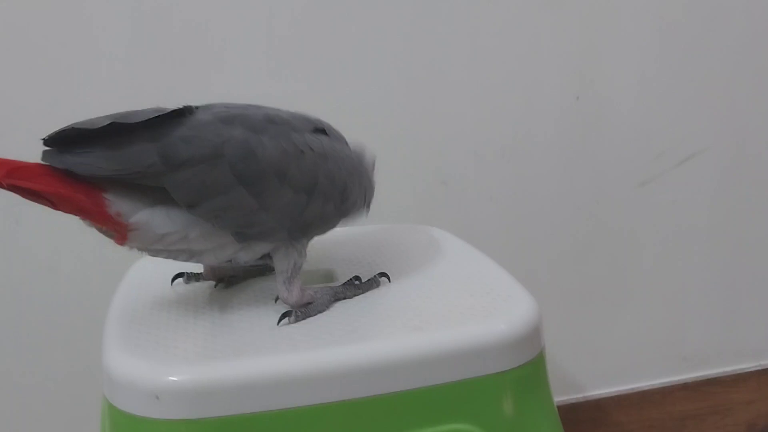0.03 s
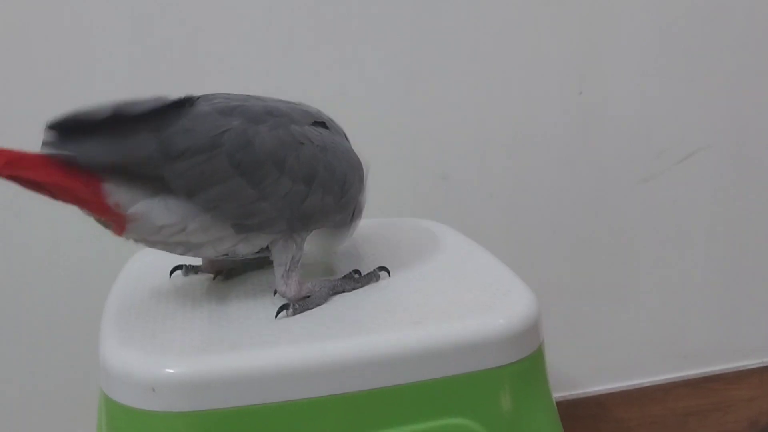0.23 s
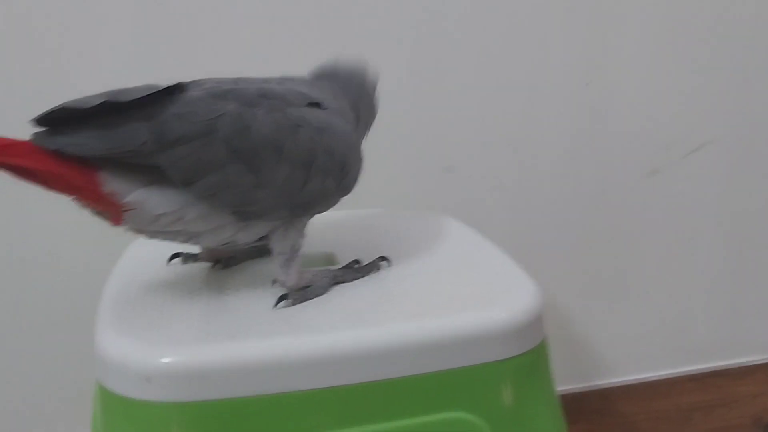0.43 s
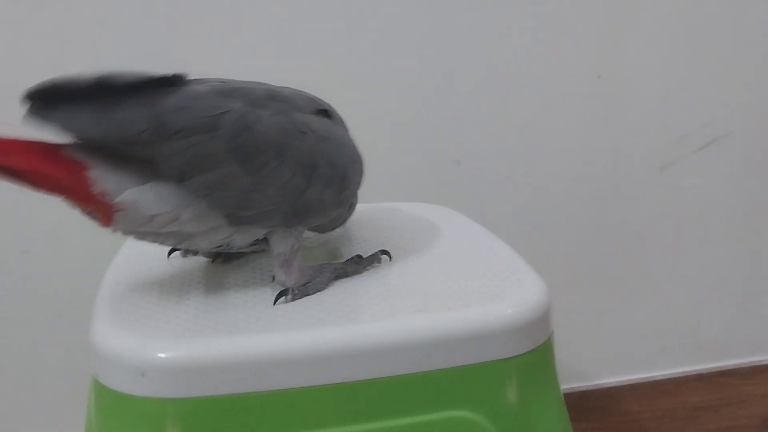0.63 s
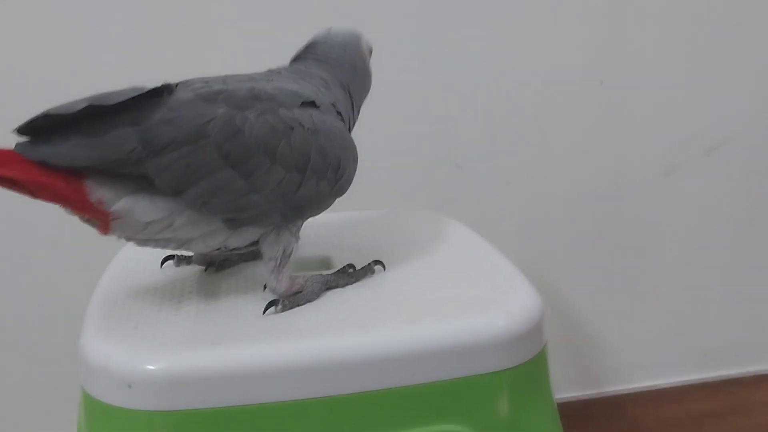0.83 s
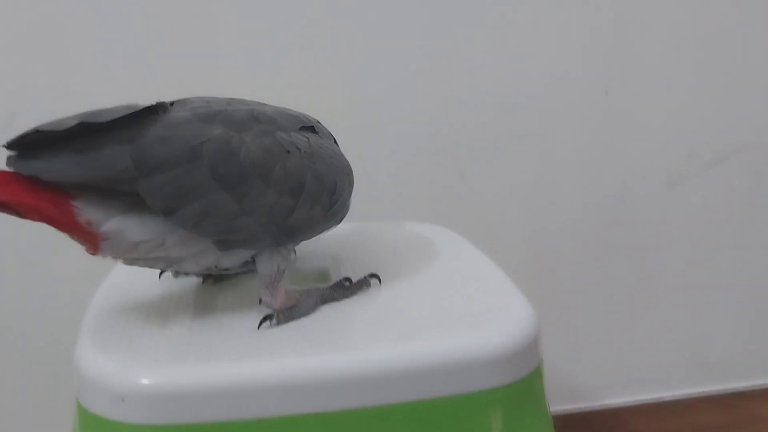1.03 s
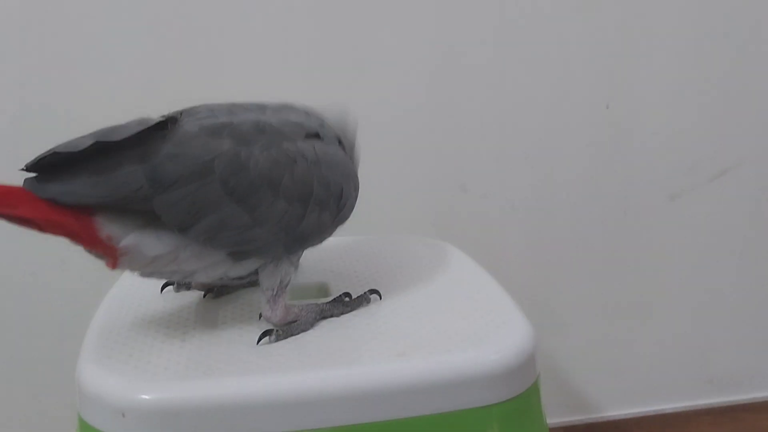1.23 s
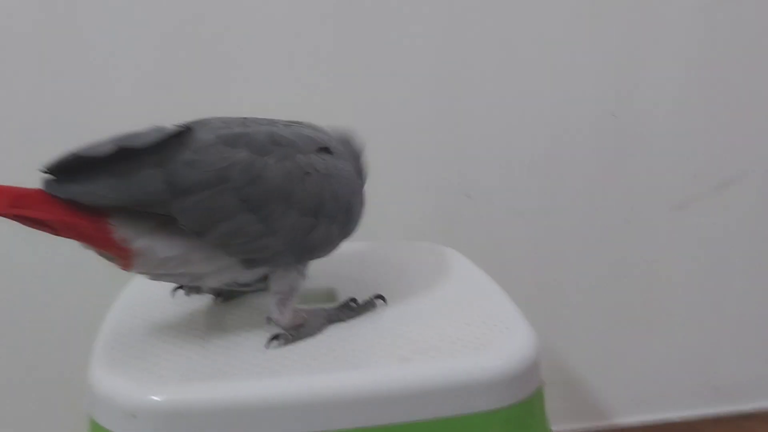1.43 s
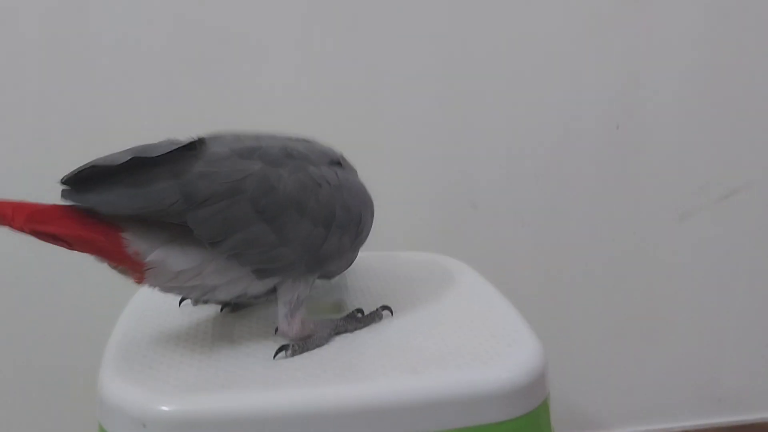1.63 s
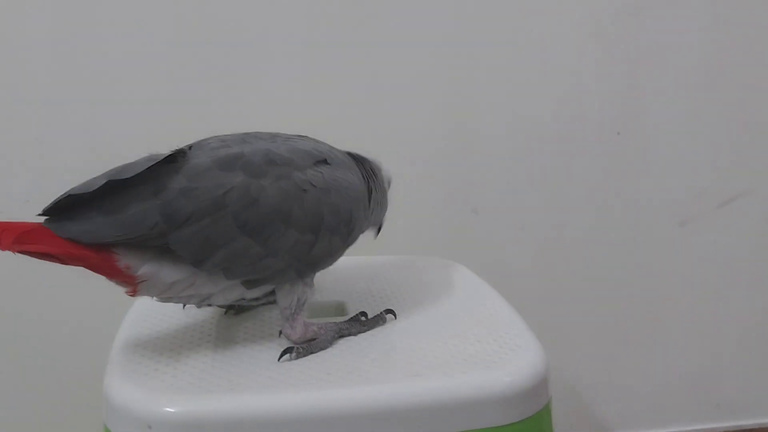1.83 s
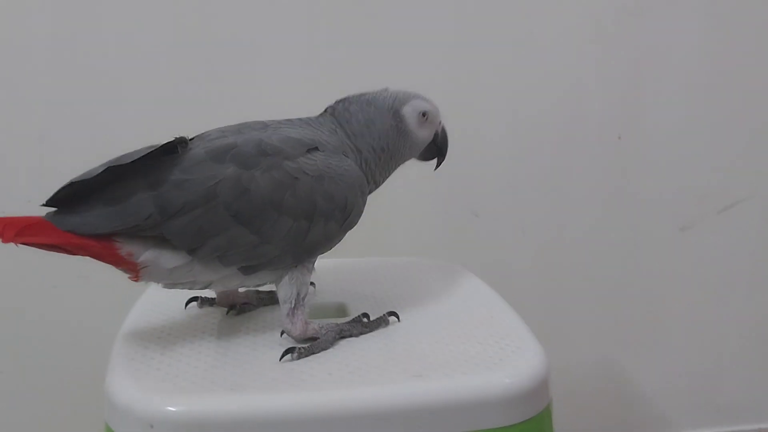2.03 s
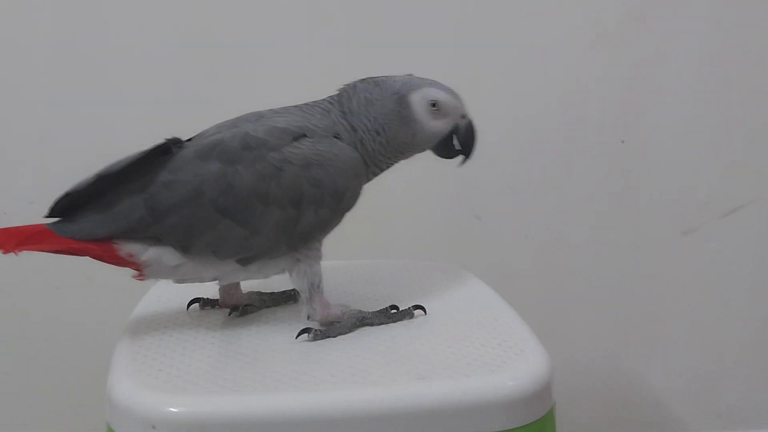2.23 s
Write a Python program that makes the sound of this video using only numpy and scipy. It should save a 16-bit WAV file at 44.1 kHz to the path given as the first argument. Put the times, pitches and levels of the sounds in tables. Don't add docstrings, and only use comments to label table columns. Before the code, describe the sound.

Six steady, sharp hollow raps of a beak on plastic, ringing in a small bare room

```python
import sys
import numpy as np
from scipy import signal
from scipy.fft import rfft, irfft
from scipy.io import wavfile

SR = 44100
rng = np.random.default_rng(int(sys.argv[2]) if len(sys.argv) > 2 else 0)


def master_out(mix):
    frames = np.transpose(np.atleast_2d(mix))
    ceiling = np.clip(frames, -1, 1)
    pcm = np.round(ceiling * 32767).astype(np.int16)
    wavfile.write(sys.argv[1], SR, pcm)


def level_to_linear(level):
    exponent = np.asarray(level, float) / 20
    return 10 ** exponent


N = 101429
LEAD = 4410

# t/s, blow level/dB, lid ring level/dB, beak click level/dB, bright edge level/dB
KNOCKS = [
    (-.035, -16.5, -10, -27, -24),
    (0.315, -17, -14.5, -26.5, -22.5),
    (.656, -17, -14.5, -26, -26.5),
    (1.006, -18, -18.5, -30.5, -29.5),
    (1.349, -19.5, -17, -28.5, -27),
    (1.6969, -24, -21.5, -32, -35.5),
]
# t/s, level/dB, length/s
TICKS = [(.246, -58.5, 0.0082), (.609, -48.5, .014), (.905, -59.5, 0.011), (0.984, -50.5, 0.011),
         (1.081, -47.5, 0.012), (2.074, -53, .006), (2.093, -65, 0.063), (2.215, -60.5, .015),
         (2.225, -57.5, .025), (2.267, -57.5, 0.049), (2.272, -54, 0.011)]
# t/s, level/dB
STEPS = [
    (2.2671, -39),
    (2.29, -36.5),
]

# f/Hz, level/dB, t60/s
LID_BODY = [(189.8, -25.5, .06), (288, -6.5, .04), (392, -12.5, 0.12), (475, -11.5, .05),
            (672, -8.5, 0.082), (882, -15, 0.041)]
LID_UPPER_RING = [(920, -23, 0.01), (1170, -22, 0.0083), (1370, 4, 0.012), (1970, -7, 0.037),
                  (2150, -15.5, 0.06), (3190, -23, 0.005)]
BEAK_CLICK = [(4750, -5, 0.019), (4940, -7.5, 0.031), (6170, -10, 0.032), (6670, 0, 0.0076),
              (6950, -14.5, .01)]

# f/Hz, level/dB
BEAK_SCRAPE = [(300, -25), (1000, -16.5), (2000, -10.5), (3200, -0.5), (5200, 16), (7500, 1), (9000, -13),
               (14000, -28.5)]
BRIGHT_EDGE = [(5000, -38.5), (8600, -8), (11800, 1), (13500, -12.5), (15200, 2.5)]
CLAW = [(500, -22), (1500, -13), (1950, -4), (2600, -16), (3900, -16), (4700, 0), (7300, -3), (9000, -14)]
FLOOR_SHAKE = [(20, -2.5), (40, -6.5), (65, -3.5), (100, -3.5), (140, -24.5), (400, -63.5)]
HUSH = [(25, -17), (60, -20), (100, -6), (160, -1.5), (400, -21.5), (900, -30), (3000, -35), (16000, -33.5)]

WAVE_HZ = [113, 135, 170, 203, 231.5, 258, 287, 332, 361, 399, 490, 516, 576, 674, 711]
# level/dB, t60/s, left over right level/dB
WAVES = [(-11, .8, -4), (-14.5, 0.61, -7.5), (-5.5, 0.8, -2.5), (1.5, .25, 3), (0, 0.55, -3),
         (-11.5, 0.78, 8.5), (-2.5, 0.76, 1), (-11, .5, -9.5), (-13, 0.96, 8.5), (-12.5, 0.39, -1),
         (-15, 0.81, 4), (-15, 0.74, -9), (-11.5, .3, -3.5), (-14, .45, 0.5), (-14.5, 0.58, -5)]
# t/s, level/dB
WALLS = [(.0027, -6), (.0062, -8), (.0092, -3.5), (.0175, -10)]

# f/Hz, t60/s
ECHO_T60 = [(100, 1), (300, 0.99), (1000, 0.56), (2500, 0.5), (5000, 0.42), (9000, 0.37), (16000, 0.2)]
# f/Hz, share/0-1
ECHO_LIKENESS = [(60, 1), (300, 1), (700, 0.04), (1500, 0), (16000, 0.5)]
# f/Hz, share/0-1
ECHO_REPEAT = [(300, .95), (1000, .8), (4000, .4)]
ECHO_SHAPE = (700, 129, 4)
# f/Hz, level/dB
BLOW_ECHO = [(100, -14.5), (170, -2.5), (260, -3), (450, 8.5), (750, 0), (1100, -15.5), (2000, -38),
             (16000, -92)]
RING_ECHO = [(300, -45.5), (800, 2), (1400, -3.5), (2000, -5), (2600, -14.5), (3300, -20.5), (5000, -21.5),
             (16000, -71)]
CLICK_ECHO = [(1500, -37.5), (3200, -9), (4300, -2.5), (5500, -5), (7400, -11.5), (8600, -28.5),
              (16000, -47.5)]
EDGE_ECHO = [(6000, -50.5), (8600, -24), (11000, -19), (13000, -11.5), (16000, -24)]

PAN_DB, LAG_S = -1.5, -.00005
BLOW_S, BEND_S = 0.00084, .0014


def read(points, hz):
    f, value = np.transpose(points)
    return np.interp(np.log(hz + 1), np.log(f + 1), value)


def add(mix, s, sound):
    part = mix[..., LEAD + round(s * SR):][..., :sound.shape[-1]]
    part += sound[..., :part.shape[-1]]


def ring(modes, wobble_db=0., size=12000):
    t = np.arange(size) / SR
    hz, db, t60 = np.transpose(modes)[:3, :, None]
    return level_to_linear(db + wobble_db - 60 * t / t60) * np.sin(2 * np.pi * hz * t)


def colour(x, table):
    gain = level_to_linear(read(table, np.fft.rfftfreq(x.shape[-1], 1 / SR)))
    return irfft(rfft(x) * gain, x.shape[-1])


def grit(table, t60, size=4096):
    x = colour(rng.standard_normal((2, size)), table)
    return x / x.std() * level_to_linear(-60 * np.arange(size) / SR / t60)


def rise(size, seconds):
    return np.minimum(np.arange(size) / SR / seconds, 1)


def hush():
    x = colour(rng.standard_normal((3, N + 1)), HUSH)[:, :N]
    return level_to_linear(-78.5) * (x[:2] + 1.3 * x[2]) / x.std()


def shake():
    out = np.zeros((2, N + LEAD))
    for s, blow_db, *_ in KNOCKS:
        rumble = grit(FLOOR_SHAKE, t60=1, size=SR) * rise(SR, 0.01)
        both_ears = rumble + .4 * rumble[::-1]
        add(out, s, level_to_linear(blow_db - 38) * both_ears)
    return out[:, LEAD:]


def echo(room, parts):
    early_db, early_t60, swell_s = -12.5, 0.21, 0.0048
    hz = np.fft.rfftfreq(256, 1 / SR)[:, None]
    t = np.arange(700) * 64 / SR
    again = read(ECHO_REPEAT, hz)
    fresh = np.sqrt(1 - again ** 2) * rng.standard_normal(ECHO_SHAPE).T
    a, b, c, d = again * room + fresh
    same = np.clip(read(ECHO_LIKENESS, hz), 0, 1)
    first, second = a + 1j * b, c + 1j * d
    ears = np.array([first, same * first + np.sqrt(1 - same ** 2) * second])
    size = np.sqrt(sum(level_to_linear(read(table, hz) + db) ** 2 for table, db in parts))
    decay = level_to_linear(-60 * t / read(ECHO_T60, hz)) + level_to_linear(early_db - 60 * t / early_t60)
    tail = signal.istft(ears * size * decay, nperseg=256, noverlap=192)[1]
    return tail * rise(tail.shape[1], swell_s) ** 2 / 10


def standing_waves(push):
    db, t60, lean_db = np.transpose(WAVES)
    wobble_db = 1.2 * rng.standard_normal((len(db), 1))
    modes = ring(np.transpose([WAVE_HZ, db, t60]), wobble_db, size=SR)
    ears = level_to_linear(np.outer([.5, -.5], lean_db)) @ modes
    return signal.fftconvolve(push[None], level_to_linear(-2.5) * ears, axes=1)


def arrivals(near):
    dull_db_per_khz, ear_s = -1, 0.00025
    hz = np.fft.rfftfreq(len(near), 1 / SR)
    side = np.array([[.5], [-.5]])
    path = level_to_linear(PAN_DB * side) * np.exp(-2j * np.pi * hz * LAG_S * side)
    for k, (s, db) in enumerate(WALLS):
        delay = s + ear_s * side * (-1) ** k
        path = path + level_to_linear(db + dull_db_per_khz * hz / 1000) * np.exp(-2j * np.pi * hz * delay)
    return irfft(rfft(near) * path, len(near))


def tick(db, length):
    burst = grit(CLAW, t60=6 * length)
    return level_to_linear(db) * burst * rise(4096, 0.34 * length)


def step(db):
    return level_to_linear(db) * ring(LID_BODY[1:]).sum(0)


def scrape(click_db, edge_db):
    rough = level_to_linear(click_db - 1.5) * grit(BEAK_SCRAPE, t60=0.045)
    return rough + level_to_linear(edge_db - 9.5) * grit(BRIGHT_EDGE, t60=0.093)


def blow(blow_db):
    t = np.arange(400) / SR
    push = np.sin(np.pi * np.clip((t - BEND_S) / BLOW_S, 0, 1)) ** 2
    return level_to_linear(blow_db) * push / push.sum()


def struck(modes):
    return ring(modes, 1.2 * rng.standard_normal((len(modes), 1))).sum(0)


def knock(push, ring_db, click_db):
    rebound_s, rebound_db = 0.011, -11
    t = np.arange(12000) / SR
    body = signal.fftconvolve(struck(LID_BODY), push)[:len(t)]
    upper = level_to_linear(ring_db) * struck(LID_UPPER_RING) * rise(len(t), BLOW_S + BEND_S)
    rebound = level_to_linear(rebound_db) * np.interp(t - rebound_s, t, upper, left=0)
    click = level_to_linear(click_db) * struck(BEAK_CLICK)
    return body + upper - rebound + click


def scene():
    near = np.zeros(N + LEAD + 1)
    mix = np.zeros((2, N + LEAD + 1))
    room = rng.standard_normal(ECHO_SHAPE).T
    for s, db, length in TICKS:
        add(mix, s, tick(db, length))
        add(mix, s, echo(room, [(CLAW, db - 7.5)]))
    for s, db in STEPS:
        add(near, s, step(db))
        add(mix, s, echo(room, [(BLOW_ECHO, db)]))
    for s, blow_db, ring_db, click_db, edge_db in KNOCKS:
        push = blow(blow_db)
        add(near, s, knock(push, ring_db, click_db))
        add(mix, s, scrape(click_db, edge_db))
        add(mix, s, standing_waves(push))
        add(mix, s, echo(room, [(BLOW_ECHO, blow_db), (RING_ECHO, ring_db),
                                (CLICK_ECHO, click_db), (EDGE_ECHO, edge_db)]))
    mix += arrivals(near)
    return mix[:, LEAD:LEAD + N] * level_to_linear([[PAN_DB / 2], [-PAN_DB / 2]])


def low_pass(x):
    return signal.sosfilt(signal.butter(12, 16820, fs=SR, output="sos"), x)


def record(dry):
    hold_s, close_s, sink_db_per_s = .205, .035, -38
    bass_duck_db, duck_db = -6, -4
    start_s, fade_in_s = .0682, .002
    low_cut = signal.butter(6, 137.2, "high", fs=SR, output="sos")
    mic = signal.sosfilt(low_cut, dry) + shake()
    bass = signal.sosfiltfilt(signal.butter(2, 457, fs=SR, output="sos"), mic)
    t = np.arange(N) / SR
    starts = np.array([k[0] for k in KNOCKS])
    since = t - starts[np.searchsorted(starts, t) - 1] - hold_s
    shut = np.clip(since / close_s, 0, 1)
    sink = level_to_linear(sink_db_per_s * np.clip(since, 0, .3))
    kept = sink * (level_to_linear(bass_duck_db * shut) * bass + level_to_linear(duck_db * shut) * (mic - bass))
    top_cut = signal.butter(12, 15900, fs=SR, output="sos")
    kept = signal.sosfiltfilt(top_cut, kept + hush())
    mix = kept * np.clip((t - start_s) / fade_in_s, 0, 1)
    return low_pass(mix)


dry = scene()
out = record(dry)
master_out(out)
```